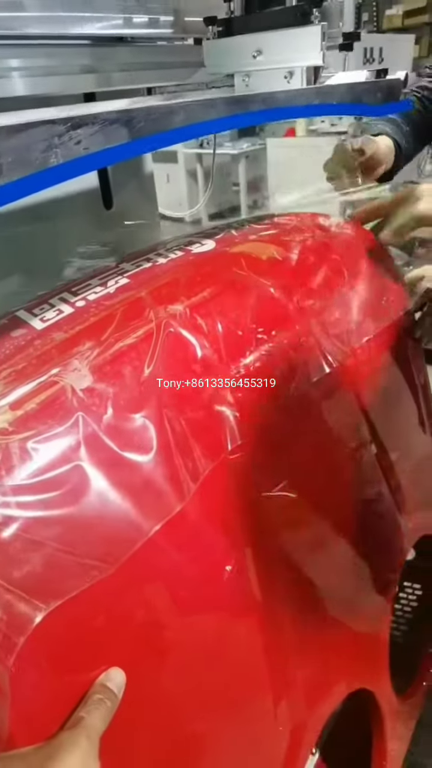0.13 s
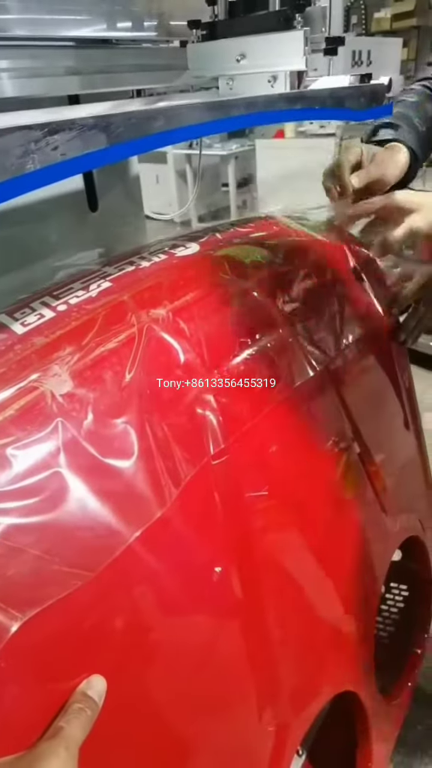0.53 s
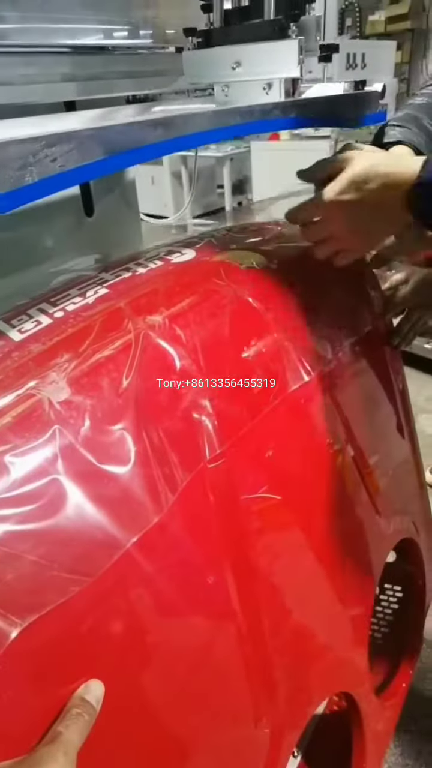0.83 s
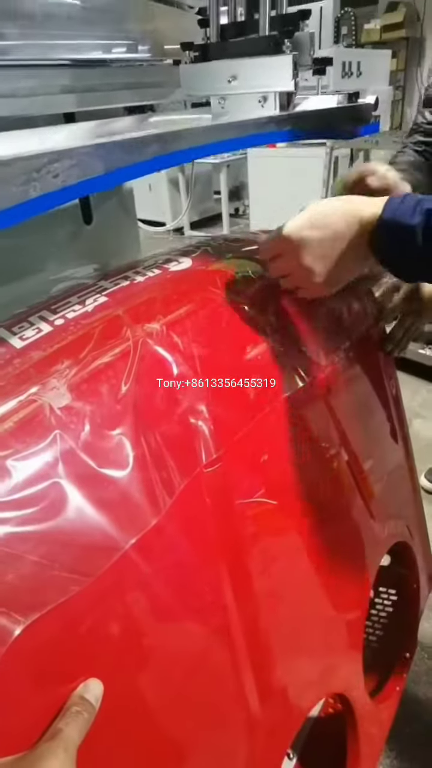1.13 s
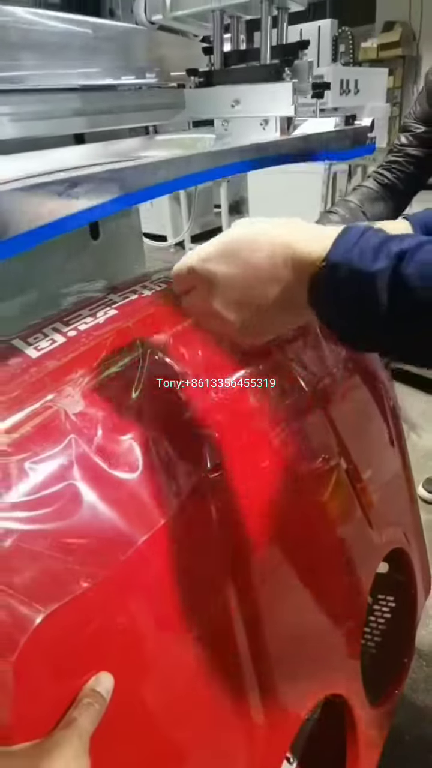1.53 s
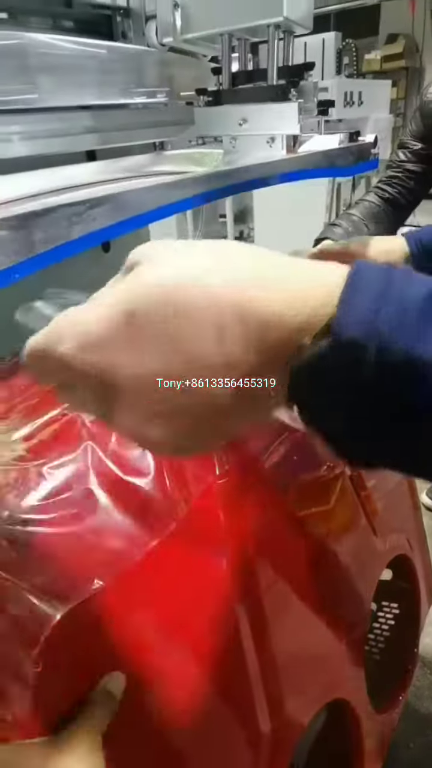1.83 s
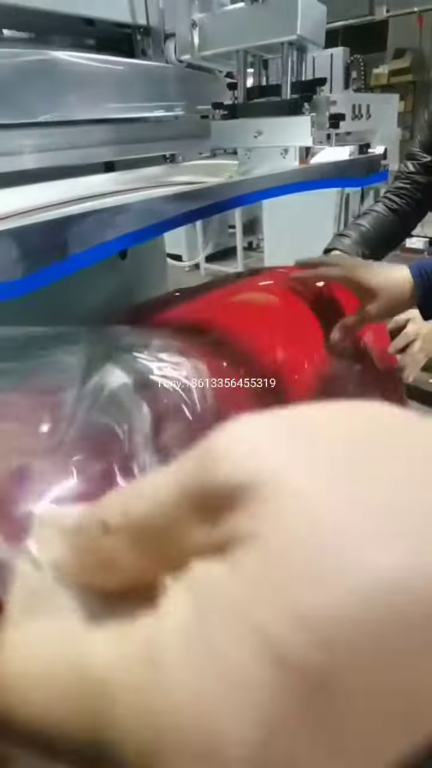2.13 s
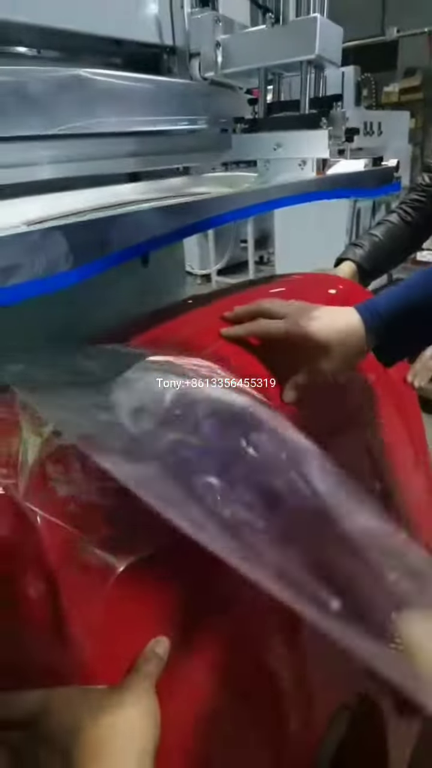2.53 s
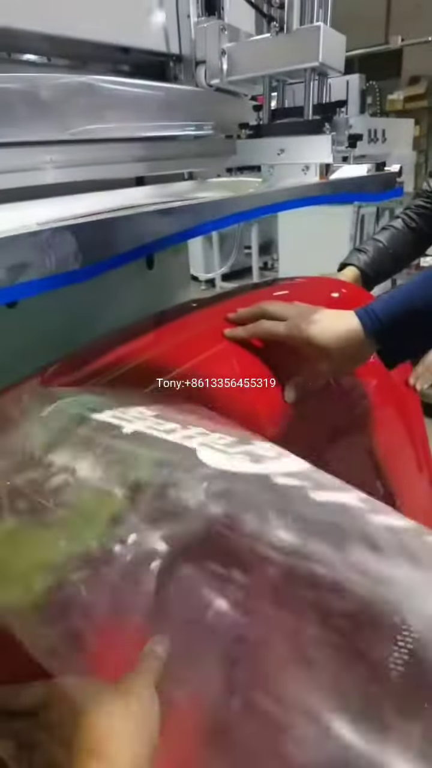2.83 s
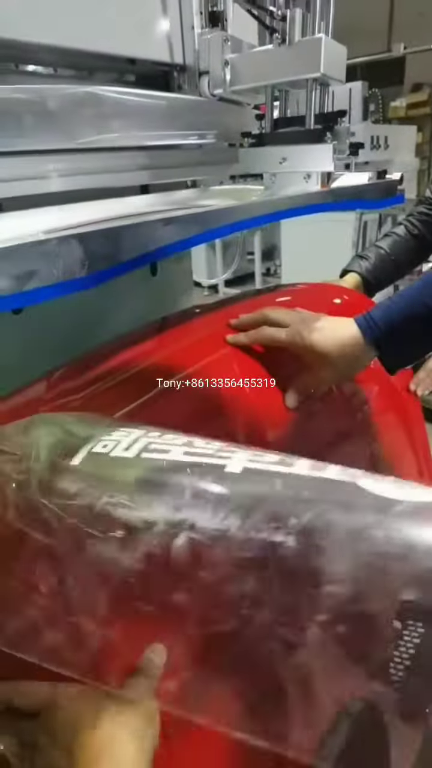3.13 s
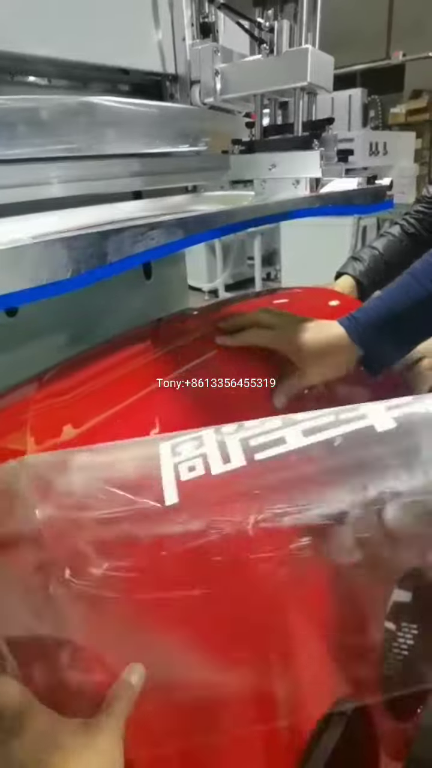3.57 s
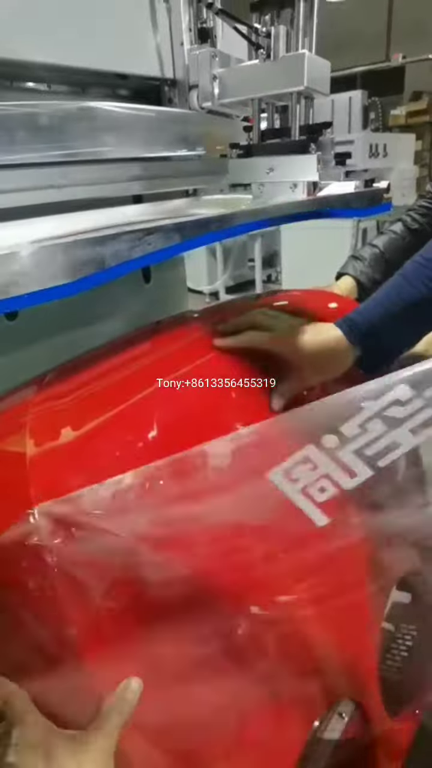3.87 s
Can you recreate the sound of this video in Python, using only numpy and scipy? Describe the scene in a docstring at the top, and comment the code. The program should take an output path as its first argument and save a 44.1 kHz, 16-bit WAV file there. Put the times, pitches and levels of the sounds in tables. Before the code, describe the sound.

Sticky plastic film peeling off a casing, with sharp crackles and long sizzling pulls.

```python
"""Peeling film off a casing

Close to the microphone, in a workshop, hands grip and crumple a plastic film on a curved casing.
It comes loose in single snaps and short rips, then tears away in long pulls: the glue lets go in
a dense crackle of tiny slips that makes the freed sheet rustle and drum. Machines rumble faintly behind."""
import sys
import numpy as np
from scipy import signal
from scipy.fft import rfft, irfft
from scipy.io import wavfile
from scipy.ndimage import uniform_filter1d

SR = 44100
rng = np.random.default_rng(int(sys.argv[2]) if len(sys.argv) > 2 else 0)


def unload_wav(signal):
    """Save mono or channel-first audio to the path in sys.argv[1] as 16-bit WAV at rate SR, clipped to [-1, 1]."""
    wavfile.write(
        sys.argv[1],
        SR,
        np.round(np.clip(np.atleast_2d(signal).T, -1, 1) * 32767).astype(np.int16),
    )


N = 176400
TIME = np.arange(N) / SR

# Levels are relative: each layer is also filtered or trimmed on its way into the mix.
# machines in the background: time_s, level_db
RUMBLE_LEVELS = [(0.0, -42.5), (0.22, -43.5), (0.27, -45), (0.62, -47.5), (0.65, -43), (0.72, -58),
                 (1.01, -45), (2.22, -59.5), (2.91, -56.5), (3.03, -62), (3.13, -53), (3.21, -67),
                 (3.64, -54), (4.0, -65)]
# their spectrum: frequency_hz, gain_db
RUMBLE_SPECTRUM = [(20, -14), (36, -16), (50, 4), (75, -8.5), (108, 2.5), (150, -3.5), (200, -0.5),
                   (300, -7), (700, -10), (2000, -14), (10000, -49)]
# the hand crumples the loose edge, then the film shifts between the fingers: time_s, level_db
CRUMPLE_LEVELS = [(0.0, -39), (0.03, -57), (0.066, -37.5), (0.08, -42), (0.157, -37), (0.165, -30),
                  (0.198, -37.5), (0.204, -31.5), (0.266, -45.5), (0.272, -43.5), (0.36, -56)]
HANDLING_LEVELS = [(.36, -54), (.42, -47.5), (.47, -38), (.58, -40.5), (.70, -45.5), (.78, -44), (.85, -33),
                   (.96, -42), (1.0, -41)]
# spectra of crumpling and handling: frequency_hz, gain_db
CRUMPLE_SPECTRUM = [(59, -32), (100, -4), (198, -8), (233, -25), (318, -2.5), (368, -9.5), (791, -3),
                    (1530, -10), (3810, -1.5), (5750, -10.5), (8880, -6), (14000, -20)]
HANDLING_SPECTRUM = [(100, -12), (350, -7), (700, 4.5), (1100, -12.5), (2500, 2), (5000, -12), (9000, 1),
                     (14000, -7)]
# single creases flipping: start_s, level_db, tilt_db_per_octave
SNAP_EVENTS = [(0.045, -25.5, -3), (0.1094, -16.5, 11), (.165, -13, -1), (0.176, -21, 2), (0.205, -12, -6),
               (0.3728, -13, -3.5), (0.437, -15.5, -2), (0.4565, -14, -5), (.463, -26, -4),
               (.475, -10.5, 2), (.528, -7.5, 0), (0.5341, -11.5, -3.5), (0.6002, -16.5, 0),
               (0.668, -16.5, -2), (0.6728, -13, 1), (0.680, -25, 4), (0.687, -29, 7), (0.695, -19.5, -1),
               (.715, -12.5, 1), (0.7338, -14, 1), (0.744, -29, 11), (0.7548, -20, 4), (0.7621, -12.5, 4),
               (0.7806, -11, -2), (0.7896, -11.5, 0), (.834, -17, 6), (0.857, -12.5, 2), (.926, -13.5, 2),
               (.942, -14, 4), (1.06, -12.5, 14), (1.083, -14, -1), (2.330, -22, -2), (2.346, -22, -6),
               (2.359, -23.5, 1), (2.379, -21.5, -5.5), (2.386, -24, 4), (2.406, -21, 6), (2.412, -20, 3),
               (2.4225, -18, -3), (2.4275, -22, 7), (2.451, -17.5, 1), (2.458, -16, -0.5),
               (2.4675, -20, -1), (2.479, -19, 4), (2.4951, -17.5, -2.5), (2.507, -17, 2),
               (2.526, -18.5, 3), (2.552, -18.5, -5), (2.574, -17, 0), (2.5871, -16.5, 9), (2.652, -19, 3),
               (2.68, -18, -1), (3.058, -17, 5), (3.077, -21, 3), (3.085, -18, 0), (3.113, -20, 5),
               (3.122, -15.5, 6), (3.137, -21, 8), (3.159, -16, 1), (3.167, -16.5, -1), (3.211, -25, 13),
               (3.222, -28.5, -4.5), (3.239, -25.5, 2), (3.268, -25, 2), (3.2971, -22, -6), (3.334, -26, 4),
               (3.342, -22, 9), (3.348, -16, 8), (3.392, -15, 7), (3.438, -16, -4), (3.571, -15.5, 0),
               (3.6292, -16.5, -4.5), (3.678, -15.5, -2.5), (3.842, -26, -4), (3.869, -20.5, -3),
               (3.891, -20, 0), (3.927, -16.5, 8), (3.968, -22, 0)]
# early snaps, thin and hard; later snaps, crisp with a dip at 5-7 kHz: frequency_hz, gain_db
EARLY_SNAP_SPECTRUM = [(150, -17), (700, -18), (1200, -14), (2500, -17.5), (3800, -7.5), (4900, -0.5),
                       (5900, -8.5), (7200, -2), (8800, 0.5), (10500, -1), (14000, -9)]
LATE_SNAP_SPECTRUM = [(150, -27), (700, -10.5), (1200, -9), (2500, -7), (4000, -2), (5200, -8), (7000, -17),
                      (8800, 2), (10500, -0.5), (14000, -3.5)]
# the film shivering around a snap: frequency_hz, gain_db
SHIVER_SPECTRUM = [(150, -7.5), (700, -6), (1200, -6.5), (2500, -1.5), (4200, 0.5), (5800, -31),
                   (7200, -20), (9200, 5.5), (14000, -11.5)]
# short rips in the glue: start_s, length_s, level_db
RIP_EVENTS = [(0.059, 0.012, -37), (0.108, .005, -33), (0.156, 0.031, -33.5), (.488, 0.014, -31),
              (0.553, 0.022, -33.5), (0.612, 0.0091, -29.5), (0.803, 0.014, -31), (0.832, 0.016, -27),
              (0.852, 0.021, -31.5), (0.876, 0.017, -33.5), (0.915, 0.028, -35), (1.027, 0.012, -31),
              (1.064, 0.026, -29.5), (1.119, 0.019, -29), (2.375, 0.0042, -42), (2.448, 0.014, -43),
              (3.055, 0.005, -36.5), (3.3, 0.0078, -45), (3.628, 0.0095, -32.5), (3.929, 0.009, -36)]
# their spectrum: frequency_hz, gain_db
RIP_SPECTRUM = [(150, -15), (700, -11), (1200, -10), (2500, -9), (4200, -2), (5800, -1.5), (7200, -2),
                (8700, 0), (10500, -1.5), (14000, -9.5)]
# resonances that swell in the stretched sheet: start_s, length_s, pitch_hz, width_hz, level_db
DRUM_SWELLS = [(0.155, 0.086, 684, 400, -43.5), (1.153, 0.5, 5400, 2000, -38.5),
               (1.562, 0.18, 760, 300, -38), (1.66, 0.155, 3020, 700, -39), (2.71, 0.19, 2070, 1110, -39)]
# the long pulls: time_s, sizzle_db, crackle_db, rustle_db
PULL_LEVELS = [(.97, -39, -47, -68), (1.0, -32.5, -39.5, -47.5), (1.14, -30, -42.5, -47.5),
               (1.19, -21.5, -35, -43.5), (1.29, -25, -38, -47.5), (1.45, -21.5, -36, -41.5),
               (1.58, -23, -38, -40), (1.68, -20.5, -32.5, -37), (1.76, -20, -29, -43),
               (1.80, -24, -39, -41.5), (1.88, -21, -32, -36), (1.96, -23, -38, -39.5),
               (2.01, -22, -37.5, -39), (2.09, -26, -35.5, -42), (2.15, -25, -37, -39),
               (2.21, -28.5, -40.5, -43.5), (2.29, -28, -41, -45), (2.32, -41.5, -49, -51.5),
               (2.40, -50.5, -81, -54), (2.52, -41.5, -49, -53), (2.56, -27, -38, -47),
               (2.60, -36, -43, -51), (2.70, -32.5, -41.5, -48.5), (2.79, -25.5, -38.5, -40),
               (2.835, -29, -43, -44.5), (2.88, -25, -30.5, -40), (2.915, -24.5, -33, -42),
               (2.935, -28, -40, -45.5), (2.98, -32.5, -39.5, -49.5), (3.045, -38.5, -50.5, -51),
               (3.09, -34, -42, -48), (3.165, -31.5, -39.5, -52), (3.195, -42.5, -57, -55),
               (3.25, -41.5, -46, -53.5), (3.29, -47, -63, -61), (3.31, -43, -50, -54),
               (3.38, -36.5, -45.5, -51), (3.40, -32, -38.5, -50.5), (3.46, -27.5, -39, -42.5),
               (3.52, -32, -41.5, -48.5), (3.58, -28, -41.5, -40.5), (3.62, -37, -45.5, -50),
               (3.68, -30.5, -41, -47), (3.78, -33, -42.5, -43.5), (3.82, -39.5, -48.5, -49),
               (3.922, -39.5, -48.5, -52.5), (3.935, -31, -43.5, -57), (3.97, -26.5, -40, -49),
               (4.0, -32, -41, -48)]
# how fast the glue lets go: time_s, slips_per_s
PULL_SLIP_RATE = [(1.0, 1770), (1.25, 3450), (1.7, 4970), (2.2, 3200), (2.4, 350), (2.65, 800), (2.9, 4300),
                  (3.05, 400), (3.33, 350), (3.45, 1960), (3.75, 1480), (3.87, 450), (4.0, 1730)]
# the peel line's sizzle, the sheet's crackle and its lower rustle: frequency_hz, gain_db
SIZZLE_SPECTRUM = [(2000, -59), (5500, -16), (7200, -12.5), (8400, -7.5), (9500, -5.5), (11000, -9.5),
                   (12500, -10.5), (14000, -9.5)]
CRACKLE_SPECTRUM = [(700, -21.5), (1400, -8), (2200, -1), (2900, 0.5), (4200, -1), (4900, -8.5),
                    (5900, -7.5), (7200, -24.5), (12000, -21)]
RUSTLE_SPECTRUM = [(80, -30.5), (200, -9.5), (450, -8), (600, -2.5), (780, 0), (1150, -1.5), (1600, -2.5),
                   (3000, -7), (8000, -37)]
# taut patches sing as the peel line crosses them: time_s, level_db
SING_LEVELS = [(1.14, -47), (1.22, -40.5), (1.4, -36.5), (1.55, -38), (1.68, -32.5), (1.78, -41),
               (1.95, -34), (2.15, -43), (2.29, -45)]
# the freed sheet's drone, rising as it is pulled tight: time_s, pitch_hz, level_db
DRONE_CURVE = [(1.25, 325, -56), (1.45, 329.4, -53), (1.8, 325.7, -55), (2.02, 327.3, -65),
               (2.08, 323.7, -48.5), (2.15, 390.3, -49), (2.22, 347.3, -51), (2.28, 315.6, -45),
               (2.33, 323.6, -58.5), (2.58, 325, -56)]

RUMBLE_TRIM_DB, HUM_HZ, HUM_DB = -2.5, 49.7, -13.5
CRUMPLE_TRIM_DB, HANDLING_TRIM_DB, CREASES_PER_S = 2.5, -2.5, 1400
SNAP_TRIM_DB, SNAP_ATTACK_S, SNAP_DECAY_S, SHIVER_DECAY_S, SHIVER_DB = -4, 0.00033, 0.0011, 0.0044, -11
LATE_SNAPS_FROM_S = 2.0   # from here on the snaps sound crisp, with a dip at 5-7 kHz
RIP_TRIM_DB, RIP_ATTACK_S, RIP_RELEASE_S, RIP_SLIPS_PER_S = 1.5, 0.0017, 0.0038, 3500
SIZZLE_TRIM_DB, CRACKLE_TRIM_DB, RUSTLE_TRIM_DB = -3, 1.5, 0.5
STUTTER_DB, STUTTER_HZ = 1, 55
PATCH_LIFE_S = .045   # how long the same patches ring before the peel line moves on
SHARED_SLIPS = 0.7   # share of the sheet's crackle set off by the peel line; the rest is creasing
SING_LOW_HZ, SING_HIGH_HZ, SING_WIDTH_HZ, SINGS_PER_S, SING_LENGTH_S = 2390, 4710, 56, 80, .04
DRONE_WIDTH_HZ = 46
ROOM_T60_S, ROOM_DB, ROOM_DELAY_S = 0.035, -13.5, 0.0032
MIC_PEAK_HZ, MIC_PEAK_WIDTH_HZ, MIC_PEAK_GAIN, CUTOFF_HZ = 8900, 760, 0.89, 14050


def from_db(db):
    """Decibels to gain."""
    return 10 ** (np.asarray(db) / 20)


def unit_rms(x):
    """Scale to an rms of 1."""
    return x / np.sqrt(np.mean(x ** 2) + 1e-20)


def level(rows, column=1):
    """Gain along a dB curve, fading quickly outside it."""
    rows = np.array(rows)
    times = np.maximum.accumulate(rows[:, 0])
    outside_s = np.maximum(times[0] - TIME, 0) + np.maximum(TIME - times[-1], 0)
    return from_db(np.interp(TIME, times, rows[:, column])) * np.exp(-outside_s / 0.0091)


def colour(x, spectrum, size=4096):
    """Filter to the shape of a spectrum, at unit power gain below the cutoff."""
    hz, db = np.transpose(spectrum)
    grid_hz = np.maximum(np.arange(size // 2 + 1) * SR / size, 1)
    gain = from_db(np.interp(np.log(grid_hz), np.log(hz), db))
    cepstrum = irfft(np.log(gain))
    cepstrum[1:size // 2] *= 2   # minimum phase: nothing rings ahead of a click
    cepstrum[size // 2 + 1:] = 0
    response = np.exp(rfft(cepstrum))
    response /= np.sqrt(np.mean(abs(response) ** 2 * (grid_hz < CUTOFF_HZ)))
    return signal.fftconvolve(x, irfft(response))[:N]


def resonance(x, hz, width_hz):
    """One resonance with a gain of 1 at its peak."""
    r = np.exp(-np.pi * width_hz / SR)
    feedback = [1, -2 * r * np.cos(2 * np.pi * hz / SR), r * r]
    return signal.lfilter(np.array([1, 0, -1]) * (1 - r * r) / 2, feedback, x)


def drift(rate_hz):
    """A slow random wander of unit rms."""
    r = np.exp(-2 * np.pi * rate_hz / SR)
    return unit_rms(signal.lfilter([1], [1, -2 * r, r * r], rng.standard_normal(N + SR))[SR:])


def narrow_ring(hz, width_hz):
    """A resonance along a pitch curve, kept ringing by chance slips; unit rms."""
    phase = 2 * np.pi * np.cumsum(hz) / SR
    r, settle = np.exp(-2 * np.pi * width_hz / SR), SR // 20
    noise = rng.standard_normal((2, len(hz) + settle))
    shake = signal.lfilter([1], [1, -2 * r, r * r], noise)[:, settle:]
    return unit_rms(shake[0] * np.cos(phase) + shake[1] * np.sin(phase))


def slips(per_s, spread_db):
    """Random clicks of uneven, stuttering size, at a steady mean power of 1."""
    sizes = from_db(spread_db * np.minimum(rng.exponential(1, N), 4.5)) * rng.choice([-1, 1], N)
    clicks = sizes * (rng.random(N) < per_s / SR) * from_db(STUTTER_DB * drift(STUTTER_HZ))
    power = uniform_filter1d(clicks ** 2, size=1000)
    return clicks / np.sqrt(np.maximum(power, 1e-4))


def film_patches(clicks, decay_s, count=4):
    """Each click briefly rings one of a few patches of film; the patches change as the film moves."""
    out, t = np.zeros(N + SR), TIME[:SR // 50]
    patch_hit = rng.integers(0, count, N)
    patch_clicks = clicks * (patch_hit == np.arange(count)[:, None])
    rings = rng.standard_normal((200, count, len(t))) * np.exp(-t / decay_s)
    rings /= np.linalg.norm(rings, axis=-1, keepdims=True)
    step = int(PATCH_LIFE_S * SR)
    for start, ring in zip(range(0, N, step), rings):
        sound = signal.fftconvolve(patch_clicks[:, start:start + step], ring, axes=1).sum(axis=0)
        out[start:start + len(sound)] += sound
    return out[:N]


def machines():
    """Low rumble from the back of the workshop, with a wavering motor hum in it."""
    hum = from_db(HUM_DB + 2.5 * drift(rate_hz=2.5)) * np.sin(2 * np.pi * HUM_HZ * TIME)
    rumble = colour(rng.standard_normal(N), RUMBLE_SPECTRUM)
    return (rumble + hum) * level(RUMBLE_LEVELS) * from_db(RUMBLE_TRIM_DB)


def hands():
    """Dull creasing as fingers crumple the edge and work it loose."""
    creases = film_patches(slips(CREASES_PER_S, spread_db=1), decay_s=0.0031)
    crumple = colour(creases, CRUMPLE_SPECTRUM) * level(CRUMPLE_LEVELS) * from_db(CRUMPLE_TRIM_DB)
    handling = colour(creases, HANDLING_SPECTRUM) * level(HANDLING_LEVELS) * from_db(HANDLING_TRIM_DB)
    return crumple + handling


def snaps():
    """A crease flips: a sharp crack of its own brightness, then a duller shiver of the film around it."""
    cracks, shivers, t = np.zeros(N + SR), np.zeros(N + SR), TIME[:SR // 20]
    rise = np.minimum(t / SNAP_ATTACK_S, 1)
    octaves = np.log2(np.clip(np.fft.rfftfreq(len(t), 1 / SR), 2500, CUTOFF_HZ) / 8000)
    for start_s, level_db, tilt_db in SNAP_EVENTS:
        start = int(start_s * SR)
        crack, shiver = from_db(level_db + SNAP_TRIM_DB) * rise * rng.choice([-1, 1], (2, len(t)))
        tilted = rfft(crack * np.exp(-t / SNAP_DECAY_S)) * from_db(tilt_db * octaves)
        cracks[start:start + len(t)] += irfft(tilted, len(t))
        shivers[start:start + len(t)] += shiver * np.exp(-t / SHIVER_DECAY_S)
    is_late = TIME > LATE_SNAPS_FROM_S
    early = colour(cracks[:N] * ~is_late, EARLY_SNAP_SPECTRUM)
    late = colour(cracks[:N] * is_late, LATE_SNAP_SPECTRUM)
    return early + late + from_db(SHIVER_DB) * colour(shivers[:N], SHIVER_SPECTRUM)


def rips():
    """A small patch of glue gives way in a quick run of slips."""
    gain = np.zeros(N)
    for start_s, length_s, level_db in RIP_EVENTS:
        attack = np.clip((TIME - start_s) / RIP_ATTACK_S, 0, 1)
        release = np.exp(-np.maximum(TIME - start_s - length_s, 0) / RIP_RELEASE_S)
        gain += from_db(level_db) * attack * release
    tearing = film_patches(slips(RIP_SLIPS_PER_S, spread_db=1), decay_s=0.0011)
    return colour(gain * tearing, RIP_SPECTRUM) * from_db(RIP_TRIM_DB)


def drumming():
    """Resonances of the taut sheet swell and fade as it is tugged."""
    out = np.zeros(N)
    for start_s, length_s, pitch_hz, width_hz, level_db in DRUM_SWELLS:
        progress = np.clip((TIME - start_s) / length_s, 0, 1)
        swell = np.sqrt(np.abs(np.sin(np.pi * progress)))
        band = resonance(rng.standard_normal(N), pitch_hz, width_hz)
        out += from_db(level_db) * swell * unit_rms(resonance(band, pitch_hz, width_hz))
    return out


def pulls():
    """Slips sizzle at the peel line and set the freed sheet crackling and rustling."""
    per_s = np.interp(TIME, *np.transpose(PULL_SLIP_RATE))
    glue = slips(per_s, spread_db=0.5)
    sheet = np.sqrt(SHARED_SLIPS) * glue + np.sqrt(1 - SHARED_SLIPS) * slips(per_s, spread_db=2)
    sizzle = colour(film_patches(glue, decay_s=0.0026), SIZZLE_SPECTRUM)
    crackle = colour(film_patches(sheet, decay_s=0.0014, count=3), CRACKLE_SPECTRUM)
    rustle = colour(film_patches(sheet, decay_s=0.0018), RUSTLE_SPECTRUM)
    return (sizzle * level(PULL_LEVELS, column=1) * from_db(SIZZLE_TRIM_DB)
            + crackle * level(PULL_LEVELS, column=2) * from_db(CRACKLE_TRIM_DB)
            + rustle * level(PULL_LEVELS, column=3) * from_db(RUSTLE_TRIM_DB))


def singing():
    """Patch after patch of taut film rings at its own pitch, giving the pull a shifting, raspy tone."""
    out = np.zeros(N + SR)
    swell = np.sin(np.pi * np.linspace(0, 1, int(SING_LENGTH_S * SR)))
    starts_s = np.arange(SING_LEVELS[0][0] - SING_LENGTH_S, SING_LEVELS[-1][0], 1 / SINGS_PER_S)
    for start_s, (lateness, tightness) in zip(starts_s, rng.random((len(starts_s), 2))):
        pitch_hz = np.full(len(swell), SING_LOW_HZ * (SING_HIGH_HZ / SING_LOW_HZ) ** tightness)
        start = int((start_s + lateness / SINGS_PER_S) * SR)
        out[start:start + len(swell)] += swell * narrow_ring(pitch_hz, SING_WIDTH_HZ)
    overlap_power = SINGS_PER_S * SING_LENGTH_S / 2
    return out[:N] * level(SING_LEVELS) / np.sqrt(overlap_power)


def drone():
    """The lowest resonance of the sheet follows its tension and trails off as it slackens."""
    time_s, pitch_hz, _ = np.transpose(DRONE_CURVE)
    return narrow_ring(np.interp(TIME, time_s, pitch_hz), DRONE_WIDTH_HZ) * level(DRONE_CURVE, column=2)


def workshop(x):
    """Short, diffuse reflections reach the microphone from machines and walls, a little dull."""
    t = TIME[:SR]
    tail = rng.standard_normal(SR) * from_db(-60 * t / ROOM_T60_S) * (t > ROOM_DELAY_S)
    wet = signal.fftconvolve(x, tail / np.linalg.norm(tail))[:N]
    return from_db(ROOM_DB) * signal.sosfilt(signal.butter(1, 7000, fs=SR, output="sos"), wet)


def scene():
    """In mono: the film close by, the room around it, machines behind."""
    film = hands() + snaps() + rips() + drumming() + pulls() + singing() + drone()
    return (film + workshop(film) + machines())[None]


def record(dry):
    """The microphone port rings in the high treble; the top is cut steeply."""
    bright = dry + MIC_PEAK_GAIN * resonance(dry, MIC_PEAK_HZ, MIC_PEAK_WIDTH_HZ)
    return signal.sosfilt(signal.ellip(12, .2, 80, CUTOFF_HZ, fs=SR, output="sos"), bright)


dry = scene()
out = record(dry)
unload_wav(out)
```